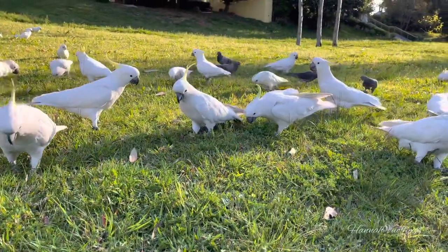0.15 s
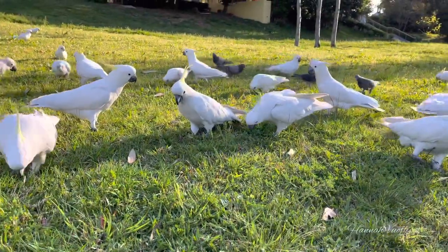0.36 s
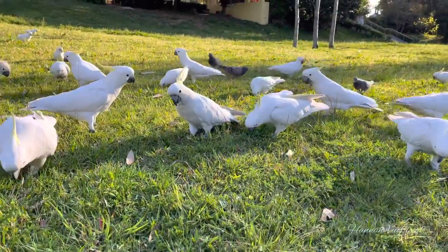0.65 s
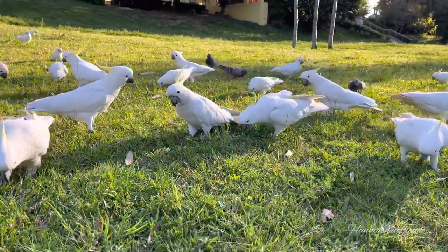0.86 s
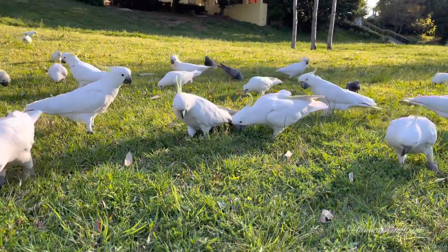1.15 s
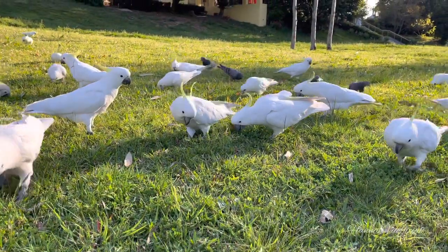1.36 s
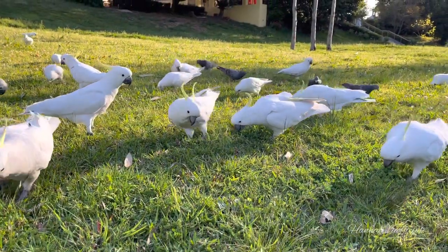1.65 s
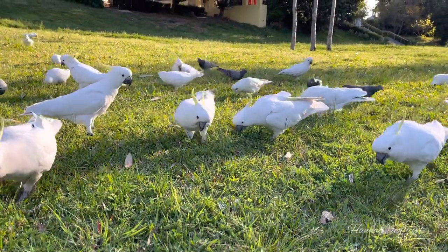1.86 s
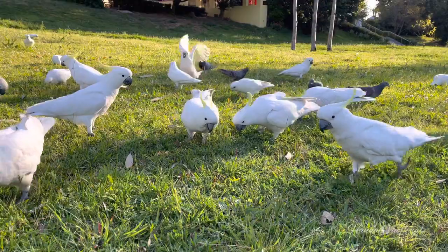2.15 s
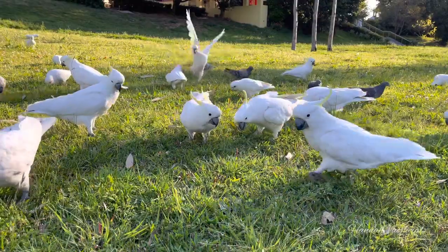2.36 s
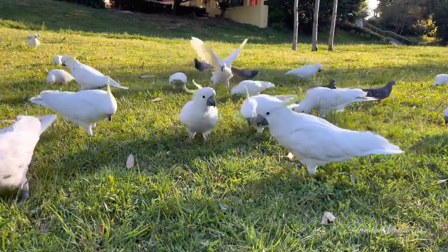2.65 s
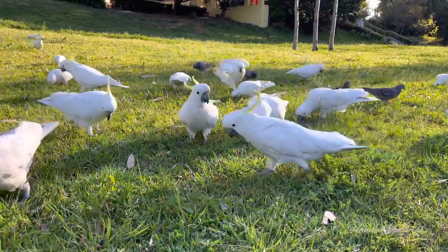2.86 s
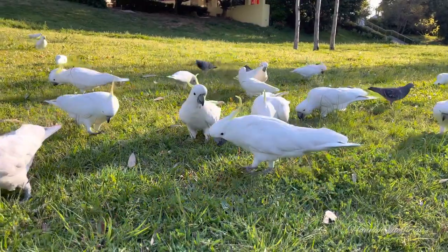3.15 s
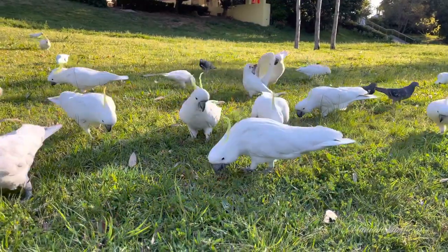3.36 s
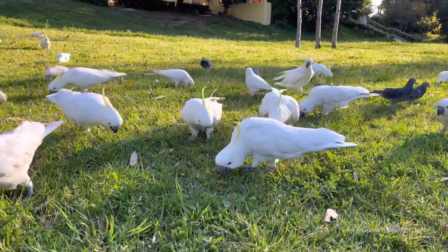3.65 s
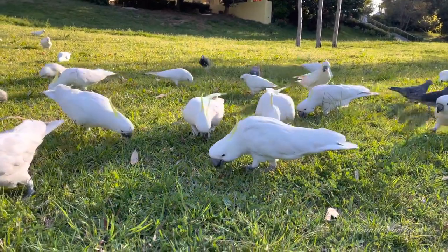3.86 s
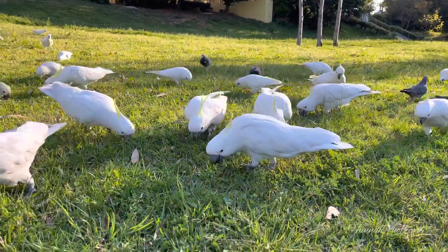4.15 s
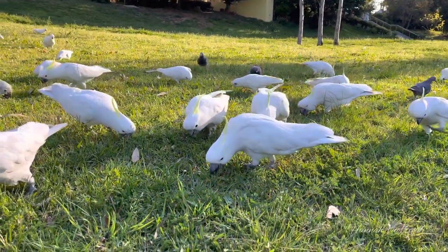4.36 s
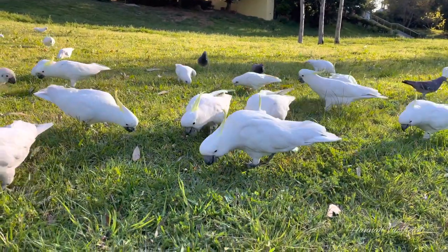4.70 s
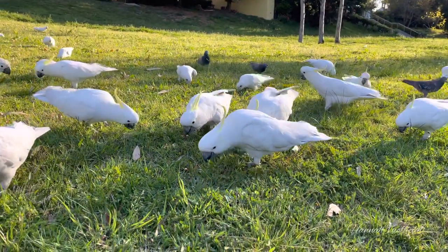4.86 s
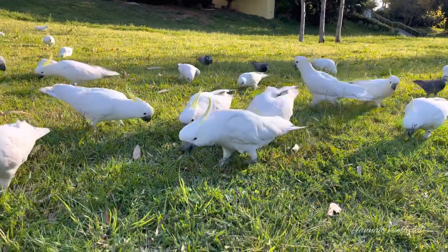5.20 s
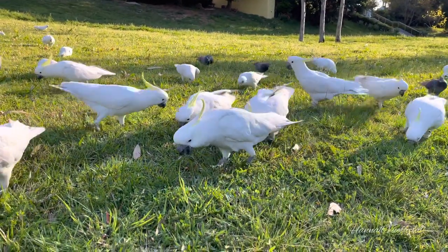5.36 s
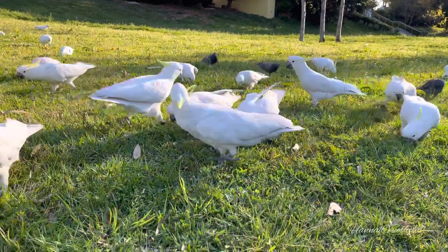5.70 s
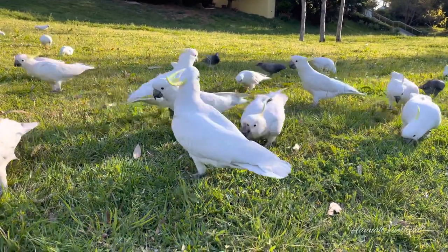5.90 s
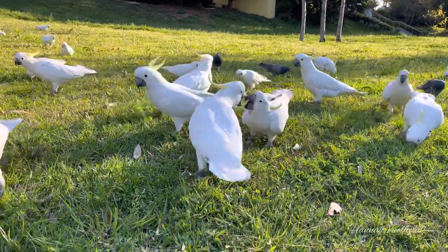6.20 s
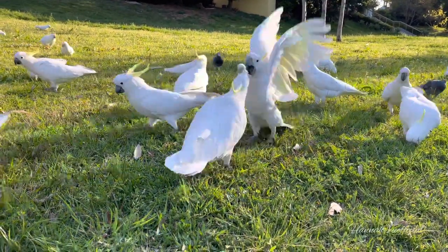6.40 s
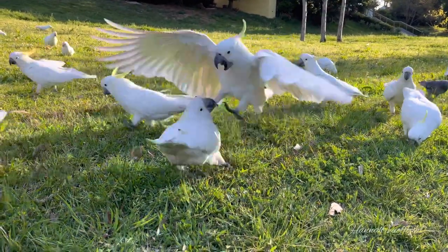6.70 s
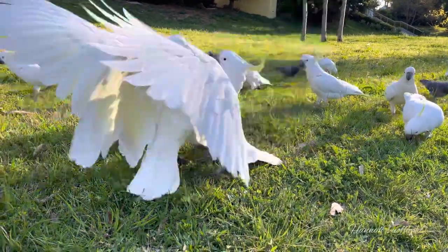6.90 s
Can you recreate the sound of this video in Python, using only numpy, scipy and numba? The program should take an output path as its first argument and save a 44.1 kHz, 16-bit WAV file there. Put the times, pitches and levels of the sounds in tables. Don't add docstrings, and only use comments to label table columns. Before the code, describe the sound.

A stereo phone microphone sits a few metres from cockatoos feeding on a park lawn. Hissy grass and feather rustle begins with little bass; soft footfalls come around 0.3-0.45 s, with faint small-bird whistles. A strong double beak tick snaps at 1.85 s, beside a faint rising trill. By 1.6 s low wind rumble has opened up and gusts continue; a faint far motor drones from 2.6 to 5.8 s. At 3.2 s a loud, rasping squawk lasts about 0.2 s, with light outdoor echoes. Clear chirps plunge in pitch from 4.1 to 5.7 s, strongest near 5.4, among ticks and tiny rattles. A short rough squawk comes at 5.66 s. A distant bird carols upward at 5.8 and 6.5 s, with quick high-low whistles. Wing puffs, bright ticks and rustling swell from 6.3 s; a very brief noisy screech hits at 6.85 s, and rustling peaks at the end.

```python
import sys
import numpy as np
from scipy import signal
from scipy.fft import rfft, irfft
from scipy.io import wavfile
from scipy.ndimage import uniform_filter1d
from numba import njit

SR = 44100
rng = np.random.default_rng(int(sys.argv[2]) if len(sys.argv) > 2 else 0)


def ratio(d):
    e = np.asarray(d, float) / 20
    return 10 ** e


def transcribe(u):
    v = np.clip(np.atleast_2d(u).T, -1, 1)
    q = np.round(v * 32767).astype(np.int16)
    wavfile.write(sys.argv[1], SR, q)


N = 310464
T = np.arange(N) / SR

# start_s, level_db, pulse_rate_hz, roughness_0_to_1
SQUAWK_ONSET = [(3.204, -52.5, 346, 0.5), (3.215, -26.5, 361.3, 0.17), (3.24, -29.5, 350.5, 0.5)]
SQUAWK_LONG = [(3.2381, -18.5, 135.3, 0.12), (3.246, -11.5, 139.1, 0.2), (3.269, -15.5, 137.1, 0.32),
               (3.295, -18.5, 133.2, 0.52), (3.312, -13.5, 138.8, 0.3), (3.335, -15.5, 154.4, 0.46),
               (3.366, -17, 161, 0.36), (3.396, -20.5, 166, 0.25), (3.405, -35.5, 130, 0.5)]
SQUAWK_SHORT = [(5.6563, -35, 88, .3), (5.666, -21, 140, 0.35), (5.68, -19, 128, .45),
                (5.695, -18.5, 135, 0.7), (5.713, -20, 138, .35), (5.735, -26, 138, 0.3),
                (5.742, -39, 190, 0.8), (5.77, -50, 255, 0.97)]
SQUAWK_FIGHT = [(6.836, -42, 645, 0.97), (6.848, -21, 618.7, 0.83), (6.868, -21, 518.8, 0.62),
                (6.884, -29, 400, 0.5), (6.887, -27, 330, 0.194), (6.9, -64, 293, 0.075),
                (6.932, -60, 217, 0.091)]
# centre_hz, width_hz, first_beak_db, last_beak_db
THROAT_ONSET = [(462, 540, -6, -14), (1500, 2400, -16.5, -3.5), (3620, 480, -6.5, -13.5),
                (4690, 503, -20.5, -20), (5700, 660, -21, -12.5), (8570, 650, -22, -12),
                (11330, 470, -20, -18)]
THROAT_LONG = [(352, 99, -21, -23.5), (837, 64, -19.5, -24), (1500, 440, -34.5, -30), (2108, 230, -0.5, 2),
               (2367, 130, -13.5, -5), (2764, 160, -8, -3.5), (3747, 320, -3.5, -5.5),
               (5300, 460, -18, -12), (4250, 160, -24.5, -17), (4600, 5000, -15, -17.5),
               (6430, 190, -15, -22.5), (8000, 590, -17.5, -17.5), (11250, 1000, -22, -21),
               (14500, 3100, -22, -19)]
THROAT_SHORT = [(400, 160, -10.5, 7), (590, 140, -7, -17), (840, 106, -2.5, -7.5), (1570, 500, 4.5, 8.5),
                (1970, 200, 1, -10), (2220, 190, -13, -26), (3150, 230, -3.5, -9), (4650, 180, -13, -30),
                (6200, 730, -17.5, -30), (7440, 3600, -21.5, -16)]
THROAT_FIGHT = [(440, 150, -28, -3), (1300, 270, -8, 4), (1650, 520, -3, 5), (2830, 280, -1.5, 0.5),
                (4550, 420, -13, -3.5), (5440, 200, -13, -16), (8200, 1100, -20, -41),
                (10750, 1700, -17.5, -5.5)]
# start_s, peak_db, crack_hz, left_minus_right_db
TICKS = [(0.5018, -41, 6300, 2), (1.345, -51, 6000, 7), (1.401, -42.5, 2100, 1), (1.408, -44, 4400, 7),
         (1.8538, -21.5, 5150, 13.5), (1.8536, -19, 7350, 2), (2.6359, -44, 8200, 12),
         (3.697, -34.5, 9560, 0), (3.8162, -45, 8600, 0), (4.4563, -39.5, 9000, 7), (4.445, -48, 9000, 6),
         (4.5228, -45, 2600, 13), (4.523, -42, 8800, 2), (4.658, -58, 6500, 12.5), (4.6734, -50, 6560, 4),
         (4.7262, -39.5, 6500, 6), (4.7461, -43, 8200, -6), (4.72, -40, 11500, 3), (4.762, -35, 10500, 3),
         (4.7711, -34.5, 5600, 4), (4.772, -30, 11500, -1), (4.779, -37.5, 11000, 0),
         (4.9731, -44, 6640, 5), (4.9884, -42, 8480, 1), (5.065, -44, 11100, -3), (5.083, -51, 5500, -2),
         (5.15, -43, 8000, 15), (5.2762, -33.5, 6400, 2), (5.2765, -29, 11500, 0), (5.5685, -47, 6600, 2),
         (6.1777, -38, 4600, 4), (6.178, -37, 2200, 0), (6.5081, -19.5, 9750, 1.5), (6.5584, -39, 5030, 2),
         (6.6972, -32, 8200, 5), (6.753, -25.5, 9200, 3), (6.797, -29.5, 9500, -1.5),
         (6.8337, -38, 4560, 17), (7.0354, -22.5, 8700, 0.5)]
# start_s, peak_db
KNOCKS = [
    (0.5018, -49.5),
    (1.8538, -32.5),
    (4.5226, -43),
    (4.6578, -48.5),
    (4.6728, -47),
    (6.1769, -49),
    (6.5575, -67),
    (6.7531, -38),
    (6.796, -48),
]
# start_s, peak_db
FOOTFALLS = [
    (0.339, -47),
    (0.355, -50),
    (0.418, -43),
    (0.439, -50),
]
# start_s, length_s, level_db
WINGS = [(0.027, 0.1, -54.5), (2.055, 0.096, -57), (2.318, 0.042, -58.5), (2.42, 0.19, -76),
         (2.495, 0.021, -55.5), (2.733, 0.14, -53), (4.954, 0.044, -80), (5.555, 0.039, -52.5),
         (6.347, 0.019, -49.5), (6.375, 0.078, -45.5), (6.504, 0.05, -46), (6.602, 0.057, -45.5),
         (6.719, 0.06, -47), (6.794, 0.046, -40.5), (6.877, 0.075, -43.5), (6.996, 0.053, -47.5)]
# start_s, mid_plunge_s, top_hz, bottom_hz, level_db
CHIRPS = [
    (4.095, .033, 3350, 2220, -56),
    (4.285, .056, 4900, 2300, -44),
    (4.385, .03, 3100, 2180, -57),
    (4.637, .039, 3400, 2120, -52),
    (4.78, .048, 4350, 2040, -40),
    (4.948, .032, 3050, 2130, -52),
    (5.078, .064, 4500, 2200, -36),
    (5.36, .062, 4500, 2140, -34),
    (5.695, .042, 3900, 2110, -36),
]
# start_s, length_s, first_hz,
# last_hz, level_db
NOTES_LEFT = [(.08, 0.048, 1500, 1500, -67.5), (.415, 0.033, 2130, 1910, -68),
              (.685, 0.048, 2540, 2330, -67), (.73, .025, 2360, 2350, -70), (.79, .05, 2480, 2330, -71),
              (.985, 0.034, 4700, 5800, -70), (1.11, 0.038, 2460, 2400, -74),
              (1.19, 0.037, 3350, 3520, -75), (1.27, .05, 4120, 4100, -77), (1.4, 0.033, 2540, 2500, -68),
              (1.72, .045, 2650, 2350, -68.5), (2.55, .09, 3260, 3130, -70),
              (3.902, 0.061, 2330, 2340, -68.5), (5.945, .055, 4000, 4460, -75),
              (6.447, 0.058, 3160, 3050, -55.5)]
# start_s, length_s, first_hz, last_hz, level_db
STROKES = [(1.31, 0.024, 4150, 3550, -72), (1.308, .02, 1820, 1750, -68), (1.326, .02, 1880, 1650, -69),
           (1.333, .017, 4250, 3470, -69), (1.336, .016, 2970, 2500, -66), (1.354, .018, 4120, 3500, -67),
           (1.351, 0.02, 3350, 2700, -63), (1.363, 0.027, 3320, 2500, -58), (3.797, 0.021, 3820, 3680, -65),
           (3.813, 0.026, 4270, 3530, -68.5), (3.833, 0.022, 4280, 3600, -65),
           (3.851, 0.023, 4550, 3470, -68), (3.865, .026, 3520, 2630, -58.5)]
# start_s, length_s, first_hz,
# last_hz, level_db
NOTES_AHEAD = [(2.31, 0.08, 1550, 1630, -63), (2.47, 0.18, 1600, 1643, -62.5),
               (2.531, .11, 1695, 1477, -56.5), (3.098, 0.023, 2420, 2394, -63),
               (3.125, 0.036, 2300, 2200, -63.5), (3.17, 0.033, 2330, 2340, -68),
               (3.812, 0.048, 2500, 2280, -57), (3.812, .026, 1877, 1710, -63),
               (3.832, .026, 2080, 1850, -61), (3.853, 0.027, 2060, 1670, -60.5),
               (3.6, .026, 2075, 2090, -73), (6.857, 0.046, 629, 266, -33.5)]
# high_start_s, low_start_s, low_level_db, pitch_share
PAIRS = [
    (6.027, 6.077, -49, 0.99),
    (6.238, 6.29, -50, 1),
    (6.477, 6.511, -49, 0.98),
    (6.688, 6.739, -45.5, 1.0),
    (6.913, 6.968, -44, 1),
]
# start_s, length_s, pitch_hz, level_db, beat_drop_share
WARBLES = [
    (.334, .044, 1250, -65, .25),
    (3.557, .064, 1215, -58, .4),
]
# multiple, level_db
WARBLE_TONES = [(2, -3), (3, 0), (4, -10)]
# start_s, length_s, first_hz, last_hz, level_db
TRILL = (1.785, .165, 2120, 2620, -61)
# start_s, length_s, click_rate_hz, peak_db, left_minus_right_db
RATTLES = [
    (5.014, 0.046, 100, -46.5, 6),
    (5.295, 0.043, 116, -43.5, 8),
    (5.605, 0.051, 110, -45, 10),
]
# pitch_hz, level_db
RATTLE_RINGS = [(3700, -20), (5000, -9), (6600, -12)]
# start_s, length_s, low_hz, high_hz, level_db
CAROL = [
    (5.776, 0.17, 1222, 1823, -32),
    (5.944, 0.24, 1343, 1770, -44.5),
    (6.401, 0.038, 1290, 1400, -41),
    (6.434, 0.063, 1245, 1194, -35),
    (6.525, 0.19, 1212, 1790, -33.5),
    (6.692, 0.116, 1351, 1893, -41),
]
# multiple, level_db
CAROL_TONES = [(.5, -13), (1, -2.5), (1.5, -23), (2.5, -23)]
# time_s, level_db
GUSTS = [(1.45, -50), (1.46, -47), (2.24, -40.5), (2.29, -41), (2.32, -46.5), (3.02, -44), (3.52, -45),
         (3.55, -43.5), (3.94, -40.5), (4.25, -44.5), (4.73, -40), (5.37, -42.5), (6.12, -41.5),
         (6.17, -48.5), (6.53, -36.5), (6.57, -42), (6.88, -32), (7.04, -43)]
# time_s, level_db
STIR = [(0, -3.5), (.25, -2), (.45, -3), (1.1, -6.5), (1.9, -4), (2.3, -3), (2.75, 4), (3.1, -0.5),
        (3.6, -3), (4.2, -8), (4.55, -1.5), (5.0, -2.5), (5.6, -1.5), (6.0, -2.5), (6.3, 2.5), (6.6, 7),
        (7.04, 17.5)]
# freq_hz, density_db_per_hz
PARK = [(25, -28.5), (53, -0.5), (114, -6), (151, -12), (298, -21.5), (408, -30.5), (1130, -30.5),
        (1670, -36.5), (2160, -37.5), (6310, -45.5), (11200, -38), (12800, -56), (16600, -82)]
# freq_hz, left_right_likeness
LIKENESS = [(60, 1), (130, 0.99), (270, 0.94), (590, 0.025), (1260, -0.17), (2690, 0.12), (5750, 0.6),
            (9000, 0.7)]
# time_s, pitch_hz, level_db
MOTOR = [
    (2.601, 113.2, -43.5),
    (3.953, 117.2, -42),
    (5.8, 123.1, -58),
]
# time_s, cutoff_hz
WIND_FILTER = [(0, 343), (.27, 324), (.33, 207), (1.1, 212), (1.28, 103), (1.45, 52.6), (1.6, 32)]
# pitch_hz, level_db
HUM = [(60, -81.5), (120, -90), (200, -81.5), (400, -72)]
# freq_hz, left_lead_rad
PORTS = [(150, 0.31), (1200, 0.5), (3500, 1.0), (6500, 0.78), (8600, 0.8), (9750, -3), (10300, -4.5),
         (10800, -4), (11800, -5.5)]
# freq_hz, gain_db
TONE_COLOUR = [(20, -2.5), (8500, 6.5), (9750, 7), (10200, -7), (10800, 12), (12500, 3.5), (13000, -13.5),
               (16000, -12.5)]


def unit(x):
    return x / np.sqrt(np.mean(x ** 2))


@njit
def svf(x, hz, width, high):
    y, b, l = np.empty(len(x)), 0., 0.
    for i in range(len(x)):
        g, k = np.tan(np.pi * hz[i] / SR), width[i] / hz[i]
        v = (b + g * (x[i] - l)) / (1 + g * (g + k))
        low = l + g * v
        b, l = 2 * v - b, 2 * low - l
        y[i] = x[i] - k * v - low if high else k * v
    return y


def band(x, hz, width):
    return svf(x, hz * np.ones(len(x)), width * np.ones(len(x)), False)


def on_log(points, hz):
    f, v = np.transpose(points)
    return np.interp(np.log(hz + 1), np.log(f + 1), v)


def walk(rate_hz):
    k = int(SR / rate_hz)
    held = np.repeat(rng.standard_normal(N // k + 1), k)
    return 2.25 * uniform_filter1d(uniform_filter1d(held, k), k)[:N]


def add(out, start_s, x, pan_db):
    i = int(start_s * SR)
    n = max(min(len(x), N - i), 0)
    for ch, side in enumerate((1, -1)):
        out[ch, i:i + n] += x[:n] * ratio(side * pan_db / 2)


def columns(rows, smooth_s):
    s, *cols = np.transpose(rows)
    t = np.arange(s[0], s[-1], 1 / SR)
    size = int(smooth_s * SR) + 1
    return [uniform_filter1d(np.interp(t, s, c), size, mode="nearest") for c in cols]


def squawk(out, rows, throat, jitter, scatter_db, breath, pan_db, stretch, opens):
    db, rate_hz, rough = columns(rows, 0.007)
    n = len(db)
    stretch = np.interp(np.linspace(0, 1, n), np.linspace(0, 1, len(stretch)), stretch)
    tremble = uniform_filter1d(uniform_filter1d(rng.standard_normal(12000), 250), 250)
    stretch = stretch * (1 + .01 * unit(tremble)[:n])

    phase = np.cumsum(rate_hz) / SR
    slaps = np.r_[0, np.flatnonzero(np.diff(np.floor(phase)))]
    timing, size = rng.standard_normal((2, len(slaps)))
    late = jitter * rough[slaps] * timing * SR / rate_hz[slaps]
    source = np.zeros(n)
    source[np.clip(slaps + late, 0, n - 1).astype(int)] = ratio(scatter_db * rough[slaps] * size)
    gate = np.convolve(source, np.exp(-np.arange(400) / SR / 0.0045))[:n]
    source += breath * rough * (gate + rough) * rng.standard_normal(n)

    source = np.r_[source * ratio(db), np.zeros(800)]
    stretch = np.r_[stretch, np.full(800, stretch[-1])]
    beak = np.interp(np.linspace(0, 1, len(source)), opens, (0, 1))
    voice = np.zeros(len(source))
    for hz, width_hz, first_db, last_db in throat:
        ring = band(source, hz * stretch, 1.15 * width_hz)
        ring = band(ring, hz * stretch, 3.2 * width_hz)
        voice += ratio(first_db + (last_db - first_db) * beak) / np.sqrt(width_hz) * ring
    add(out, rows[0][0], unit(voice) * np.sqrt(np.mean(ratio(db) ** 2)), pan_db)


def beaks():
    out, t = np.zeros((2, N)), np.arange(500) / SR
    for s, db, hz, pan_db in TICKS:
        burst = rng.standard_normal(500) * (np.exp(-t / .0007) + .1 * np.exp(-t / .003))
        burst[12] += 3
        crack = band(band(burst, hz, 4400), hz, 6500)
        crack += 1.3 * band(burst, hz, 700)
        crack += 0.9 * (hz / 9000) ** 2 * band(burst, 11500, 2200)
        crack += .15 * band(burst, 14500, 3000) + .15 * band(burst, 2600, 2500)
        add(out, s, ratio(db) * crack / np.abs(crack).max(), pan_db)
    knock = np.sin(2 * np.pi * 750 * t) * t / 0.00051 * np.exp(1 - t / 0.00069)
    for s, db in KNOCKS:
        add(out, s, ratio(db) * knock, 2.5)
    footfall = np.sin(2 * np.pi * 290 * t) * np.hanning(len(t))
    for s, db in FOOTFALLS:
        add(out, s, ratio(db) * footfall, 0)
    return out


def wings():
    out = np.zeros((2, N))
    for s, length_s, db in WINGS:
        thump_db = -1 if db > -52 else -20
        air, push, crackle = rng.standard_normal((3, 6000))[:, :int(length_s * SR)]
        puff = np.sin(np.linspace(0, np.pi, len(air))) * ratio(1.03 * unit(uniform_filter1d(crackle, 150)))
        hiss = band(air, 9500, 12000) + 1.8 * band(air, 10200, 1700) + .5 * band(air, 2800, 3000)
        hiss += 2.5 * band(band(air, 15300, 900), 15300, 900)
        thump = ratio(thump_db) * unit(band(push, 180, 440))
        add(out, s, ratio(db) * puff * (unit(hiss) + thump), .5)
    return out


def whistle(out, start_s, hz, db, pan_db, tones, flutter_db):
    phase = 2 * np.pi * np.cumsum(hz) / SR
    n = np.arange(len(hz))
    edge = np.clip(np.minimum(n, n[::-1]) / (.007 * SR), 0, 1) ** 2
    flutter = ratio(flutter_db * unit(uniform_filter1d(rng.standard_normal(12000), 300))[:len(hz)])
    tone = sum(ratio(g_db) * np.sin(k * phase) for k, g_db in tones)
    add(out, start_s, np.sqrt(2) * ratio(db) * edge * flutter * tone, pan_db)


def glide(start_s, length_s, first_hz, last_hz):
    return start_s, np.linspace(first_hz, last_hz, int(length_s * SR))


def chirps(out):
    for s, middle_s, top_hz, bottom_hz, db in CHIRPS:
        t = np.arange(int((.055 + 1.33 * middle_s) * SR)) / SR
        plunge_s = np.where((t > middle_s) & (db > -42), .012, .0145)
        hz = bottom_hz + (top_hz - bottom_hz) / (1 + np.exp((t - middle_s) / plunge_s))
        scoops, brief = middle_s > .058, middle_s < .04
        hz -= scoops * 950 * np.exp(-t / .011)

        beak_db = -15 * np.abs(np.log2(hz / 2600) / .7) ** 1.3
        favoured_hz = (6500, 9000) if scoops else (5600, 6500)
        less_db = 42 + db if scoops else max(5 * (db + 40), -2 * (db + 40))
        tones = [(1, 0)]
        for k, g_db, best_hz in zip((2, 3), (-9, -24), favoured_hz):
            off_db = np.minimum(9 * (np.log2(k * hz / best_hz) / .24) ** 2, 22 + 8 * scoops)
            tones.append((k, g_db - less_db - beak_db - off_db))
        level_db = db - 175 * np.maximum(t - middle_s - 0.037, 0)
        level_db = level_db + 1 + beak_db - 11 * np.exp(-t / .03)
        level_db -= brief * 4 * np.exp(-(t / .045) ** 3)
        whistle(out, s, hz, level_db, 2.5, tones, flutter_db=1.3 + 1.2 * brief)


def plain_notes(out):
    for notes, pan_db in ((NOTES_LEFT, 7), (STROKES, 7), (NOTES_AHEAD, -2)):
        for *line, db in notes:
            whistle(out, *glide(*line), db, pan_db, [(1, 0)], flutter_db=2.5)


def pairs(out):
    high_hz, low_hz, sag, note_s = 3690, 2170, .935, .039
    for high_s, low_s, db, share in PAIRS:
        s, hz = glide(high_s, note_s, share * high_hz, share * high_hz * sag ** .7)
        whistle(out, s, hz, db - 9, 8, [(1, 0)], flutter_db=4)
        hz = np.geomspace(high_hz * sag, low_hz, int(.034 * SR))
        whistle(out, low_s - .024, hz, db - 14, 4, [(1, 0)], flutter_db=4)
        s, hz = glide(low_s, 1.15 * note_s, share * low_hz, share * low_hz * sag ** 1.4)
        hook = 1 + .2 * np.linspace(0, 1, len(hz)) ** 12
        whistle(out, s, hz * hook, db, -4, [(1, 0)], flutter_db=3.5)


def warbles(out):
    slide = np.exp(-T[:int(.03 * SR)] / .013)
    end_hz = 1900
    for s, length_s, hz, db, swing in WARBLES:
        beat = 49.4 * T[:int(length_s * SR)] % 1
        bent_hz = hz * (1 + swing * (np.exp(-beat / .27) + .5 * beat ** 3))
        whistle(out, s, bent_hz, db, 5, WARBLE_TONES, flutter_db=4)
        slide_hz = end_hz + (3.7 * hz - end_hz) * slide
        whistle(out, s + length_s - .004, slide_hz, db + 6 - 12 * slide, 11, [(1, 0)], flutter_db=3)


def trill(out):
    s, hz = glide(*TRILL[:4])
    wave = 1.3 - 2 * np.abs(np.sin(np.pi * 48.5 * T[:len(hz)]))
    whistle(out, s, hz * (1 + .078 * wave), TRILL[4], 1.5, [(1, 0)], flutter_db=2.5)


def rattles(out):
    t = np.arange(300) / SR
    sweep_hz = 2550 + 1900 * np.exp(-t / .0009)
    click = np.sin(2 * np.pi * np.cumsum(sweep_hz) / SR)
    click *= np.exp(-t / .003) * (1 - np.exp(-t / .0005)) * 1.6
    rings = sum(ratio(g_db) * np.sin(2 * np.pi * hz * t) for hz, g_db in RATTLE_RINGS)
    click += rings * np.exp(-t / .0008) * 1.6
    for s, length_s, rate_hz, db, pan_db in RATTLES:
        for k, (size, late) in zip(np.arange(0, length_s, 1 / rate_hz), rng.standard_normal((9, 2))):
            level_db = db + 2.3 * size + 56 * (k - length_s)
            add(out, s + k + 0.00041 * late, ratio(level_db) * click, pan_db)


def songbirds():
    out = np.zeros((2, N))
    for voice in (chirps, plain_notes, pairs, warbles, trill, rattles):
        voice(out)
    return out


def carol():
    out, rest_db = np.zeros((2, N)), -54.5
    for s, length_s, low_hz, high_hz, db in CAROL:
        t = np.arange(int(length_s * SR)) / SR
        hz = low_hz + (high_hz - low_hz) / (1 + np.exp((.068 - t) / 0.017))
        hz += 139 * np.exp(-t / 0.011)
        hz -= 36000 * np.maximum(t - .13, 0) ** 2
        fade = np.exp(-np.maximum(t - 0.05, 0) / 0.12)
        level_db = rest_db + (db - rest_db) * fade - 12 * np.maximum(1 - t / 0.021, 0)
        tones = []
        for k, g_db in CAROL_TONES:
            open_db = 45 * np.log2(hz / 1830) + (k > 1) * .7 * (level_db + 43)
            tones.append((k, g_db + (k != 1) * open_db))
        whistle(out, s, hz, level_db, -0.43, tones, flutter_db=2.0)
    return out


def echoes(x, delay_s, t60_s, hz, width, db):
    t = np.arange(int(.7 * SR)) / SR
    gap = np.zeros(int(delay_s * SR))
    out = []
    for _ in range(2):
        tail = band(rng.standard_normal(len(t)), hz, width) * ratio(-60 * t / t60_s)
        tail *= ratio(db) / np.sqrt(np.sum(tail ** 2))
        out.append(signal.fftconvolve(x, np.r_[gap, tail])[:N])
    return np.array(out)


def park():
    f = np.fft.rfftfreq(N, 1 / SR)
    like = np.clip(on_log(LIKENESS, f), -.95, .95)
    density = ratio(on_log(PARK, f))
    mid, side = (rfft(rng.standard_normal(N)) * density * np.sqrt(1 + sign * like) for sign in (1, -1))
    scale = ratio(-43.5) / np.std(irfft(mid, N))

    gusts = np.interp(T, *np.transpose(GUSTS))
    stir = np.interp(T, *np.transpose(STIR))
    drives_db = np.array([gusts, 0.4 * T + 0.28 * stir, 0.72 * stir, stir])
    drives_db -= drives_db.mean(1, keepdims=True)
    drives_db += np.array([1.3 * walk(16), .7 * walk(14), .8 * walk(24), 1.5 * walk(30)])
    centres, edges_hz = np.log([150, 600, 3500, 9000]), np.geomspace(20, 16000, 14)
    out = np.zeros((2, N))
    for a, b in zip(edges_hz, edges_hz[1:]):
        share = np.array([np.interp(np.log(a * b) / 2, centres, row) for row in np.eye(len(centres))])
        mask = (f >= a) & (f < b)
        m, d = irfft(mid * mask, N), irfft(side * mask, N)
        out += ratio(share @ drives_db + 0.37 * walk(24)) * np.array([m + d, m - d])
    return scale * out


def motor():
    s, hz, db = np.transpose(MOTOR)
    phase = 2 * np.pi * np.cumsum(np.interp(T, s, hz) * (1 + 0.0018 * walk(6.0))) / SR
    fade = np.clip(np.minimum(T - s[0], s[-1] - T) / 0.13, 0, 1)
    level = ratio(np.interp(T, s, db) + 1.2 * walk(9))
    return np.sqrt(2) * fade * level * (np.sin(phase) + ratio(-9.0) * np.sin(phase / 2))


def scene():
    flock = np.zeros((2, N))
    squawk(flock, SQUAWK_ONSET, THROAT_ONSET, jitter=.2, scatter_db=6, breath=.15, pan_db=1,
           stretch=(.8, .95), opens=(.1, .6))
    squawk(flock, SQUAWK_LONG, THROAT_LONG, jitter=.04, scatter_db=2, breath=.12, pan_db=-2.4,
           stretch=(.97, 1.0, 1.0, 1.01, 1.0, .98), opens=(.2, .42))
    squawk(flock, SQUAWK_SHORT, THROAT_SHORT, jitter=.1, scatter_db=2.5, breath=.125, pan_db=1,
           stretch=(.95, 1.0, 1.02, .95, .88, .8, .76), opens=(.3, .75))
    squawk(flock, SQUAWK_FIGHT, THROAT_FIGHT, jitter=.25, scatter_db=5, breath=.07, pan_db=3,
           stretch=(1.02, .88), opens=(.15, .4))
    trees, far = songbirds(), carol()
    calls = flock.mean(0)
    lawn = echoes(calls, delay_s=0.0031, t60_s=0.055, hz=2500, width=4200, db=-15.5)
    building = echoes(calls, delay_s=0.26, t60_s=0.5, hz=2250, width=800, db=-48.0)
    songs = far.mean(0) + ratio(-11.5) * trees.mean(0)
    grove = echoes(songs, delay_s=0.014, t60_s=0.86, hz=2100, width=2654, db=-11.5)
    birds = flock + beaks() + wings() + trees + far
    return birds + lawn + building + grove + park() + motor()


def top_cut(x):
    return signal.sosfilt(signal.butter(12, 15900, fs=SR, output="sos"), x)


def record(dry):
    s, hz = np.transpose(WIND_FILTER)
    cut_hz = np.exp(np.interp(T, s, np.log(hz)))
    for width in (.39, 1.11, 1.66, 1.96):
        dry = np.array([svf(ch, cut_hz, width * cut_hz, True) for ch in dry])
    dry = dry + sum(ratio(db) * np.sin(2 * np.pi * hz * T) for hz, db in HUM)
    f = np.fft.rfftfreq(N, 1 / SR)
    turn = np.exp(.5j * on_log(PORTS, f) * np.array([[1], [-1]]))
    wet = irfft(rfft(dry) * ratio(on_log(TONE_COLOUR, f)) * turn, N)
    mix = np.clip(wet, -1, 1)
    return top_cut(mix)


dry = scene()
out = record(dry)
transcribe(out)
```